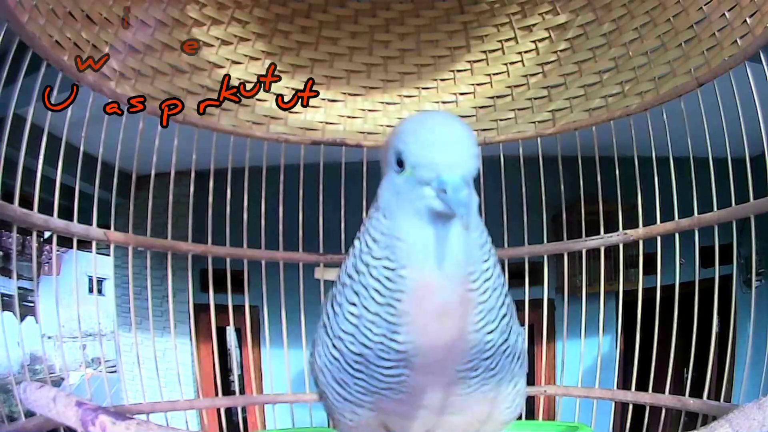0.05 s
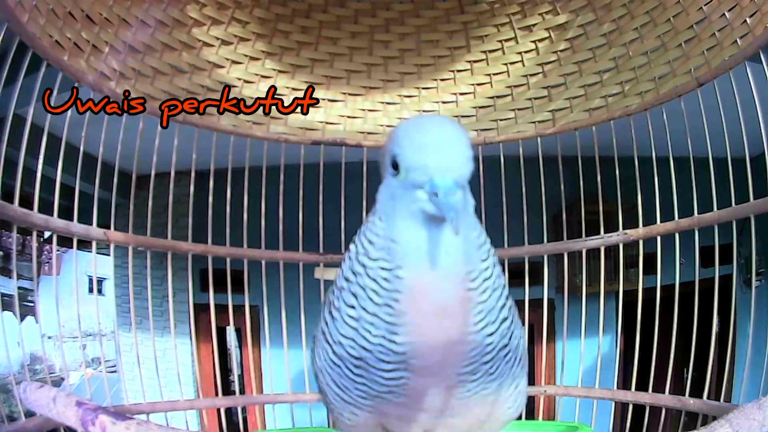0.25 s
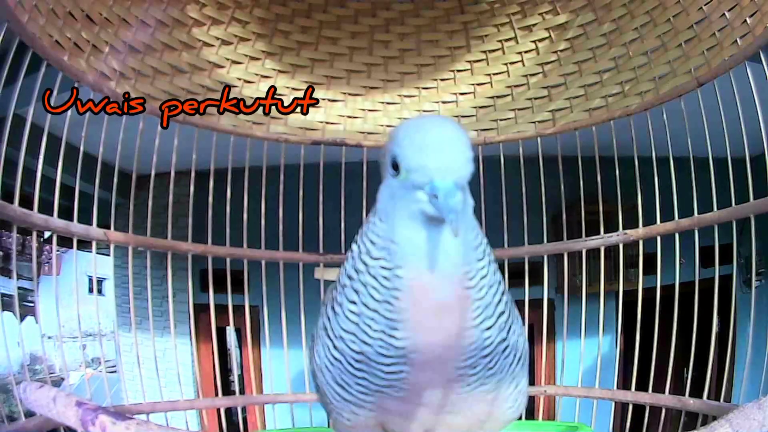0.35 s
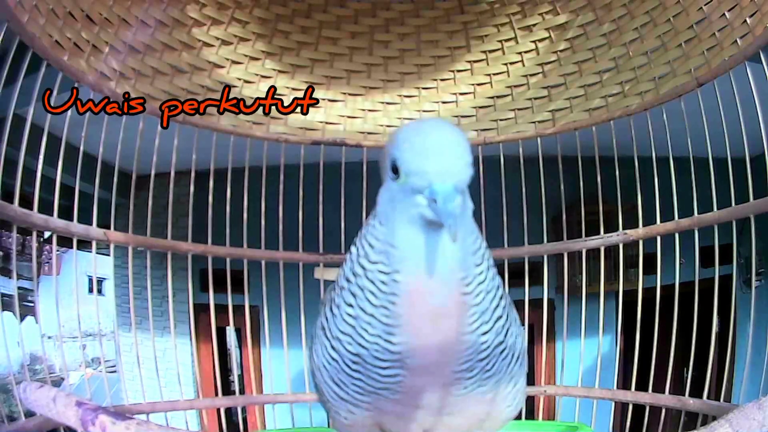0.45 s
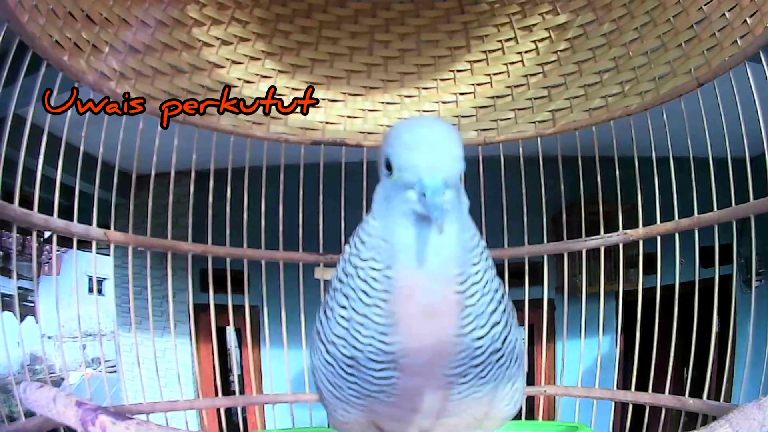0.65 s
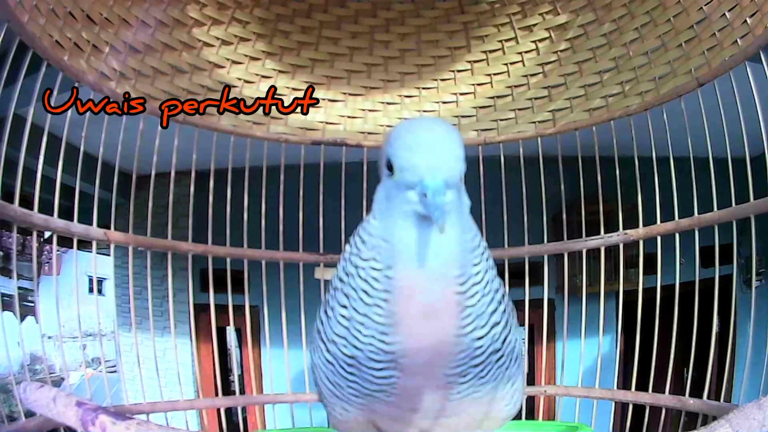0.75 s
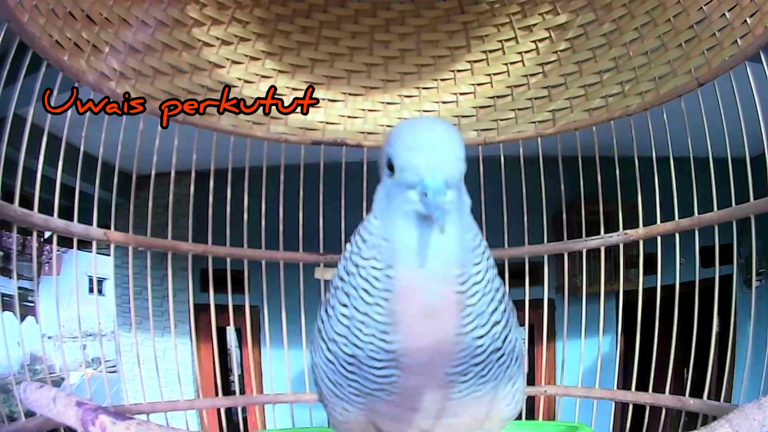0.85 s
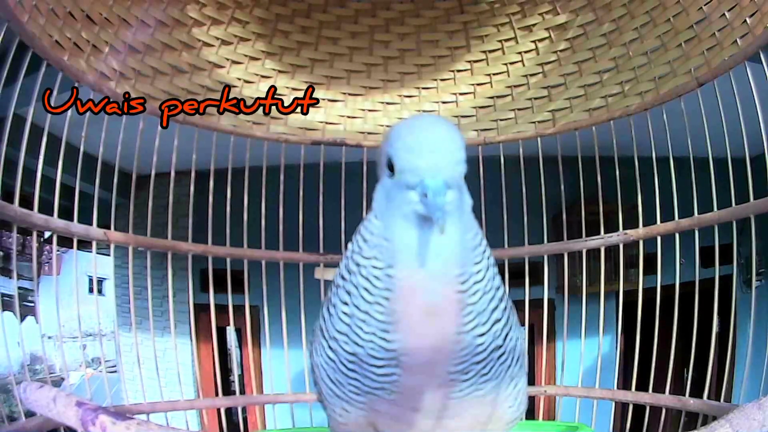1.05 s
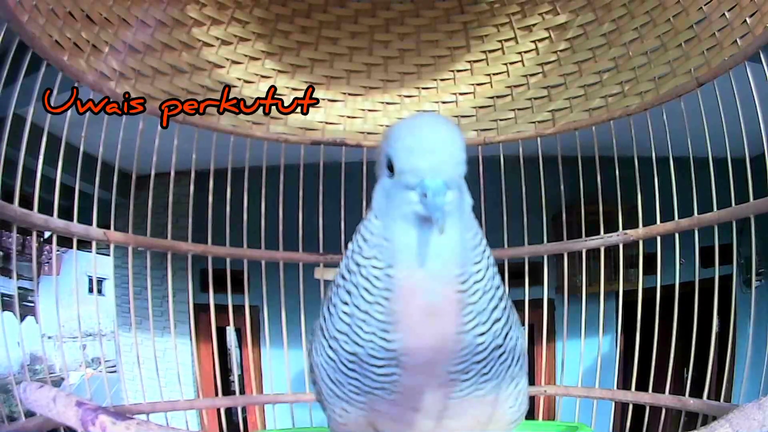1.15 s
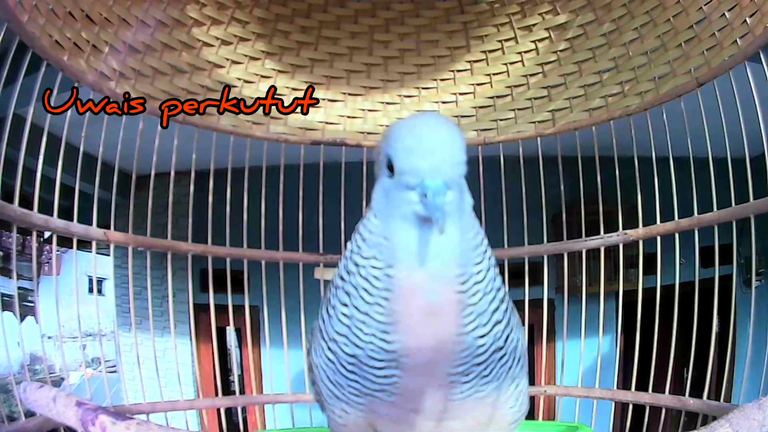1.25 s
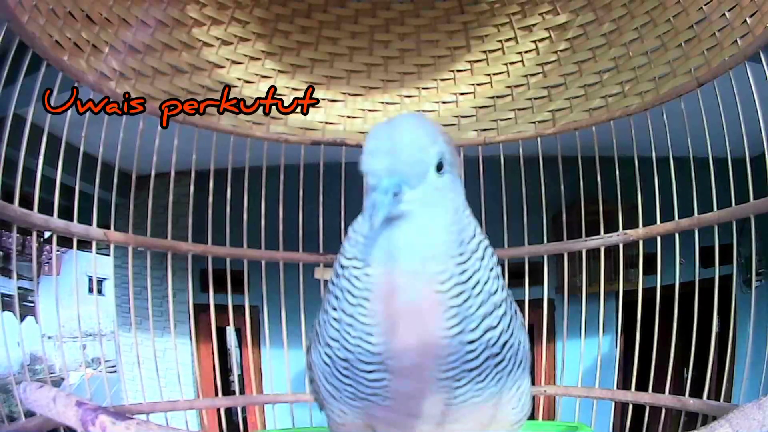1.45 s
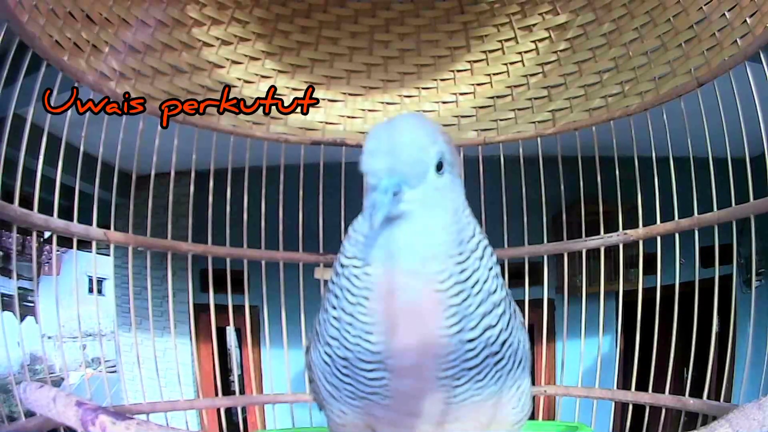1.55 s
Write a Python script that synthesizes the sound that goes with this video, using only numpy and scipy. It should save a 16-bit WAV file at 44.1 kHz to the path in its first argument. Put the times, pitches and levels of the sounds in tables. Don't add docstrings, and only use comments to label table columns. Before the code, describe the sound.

After a faint scrape, knock and tick, a caged dove gives seven loud, nearly pure coos, the last longest and fading; then soft rustling, dull thuds and far knocks, with light wind rumble, captured close on a porch.

```python
import sys
import numpy as np
from scipy import signal
from scipy.fft import rfft, irfft
from scipy.io import wavfile
from scipy.ndimage import uniform_filter1d

SR = 44100
rng = np.random.default_rng(int(sys.argv[2]) if len(sys.argv) > 2 else 0)


def voltage_ratio(decibels):
    exponent = np.asarray(decibels, float) / 20
    return 10 ** exponent


def digitize_waveform(pressure):
    field = np.atleast_2d(pressure).T
    bounded = np.clip(field, -1, 1)
    quanta = np.round(bounded * 32767).astype(np.int16)
    wavfile.write(sys.argv[1], SR, quanta)


N = 70560

# freq_hz, density_db [dB per Hz]
YARD_COLOUR = [(220, -14.5), (400, -18.5), (1100, -20), (2200, -15), (3300, -23), (4300, -39.5),
               (7000, -28.5), (8800, -59)]
# freq_hz, density_db [dB per Hz]
WIND_COLOUR = [(12, -33.5), (20, 1), (96, -9), (169, -11.5), (195, -14), (225, -14), (350, -26.5),
               (460, -22.5), (770, -120)]
# time_s, level_db
WIND_GUSTS = [(0.0, -41), (0.404, -42.5), (0.592, -39), (0.658, -37.5), (0.792, -34), (1.332, -43.5),
              (1.362, -43), (1.6, -41)]
# freq_hz, width_hz, level_db
SCRAPE_RESONANCES = [(764, 420, -43), (2250, 280, -47.5), (3500, 1000, -57), (450, 40, -54.5)]
# start_s, ring_db, ring_hz, t60_s, clatter_db
FAR_KNOCKS = [
    (.165, -45, 1010, 0.16, -41),
    (1.018, -30.5, 1530, 0.42, -38),
    (1.1, -50.5, 1462, 0.9, -59.5),
    (1.3443, -41, 2085, 0.094, -77),
    (1.51, -48.5, 2506, 0.16, -76),
]
# freq_hz, density_db [dB per Hz]
CLATTER_COLOUR = [(200, -17.5), (500, -9.5), (1300, -8.5), (1700, -7), (2600, -4), (4100, -18.5),
                  (4600, -41), (8000, -21)]
# start_s, level_db, ring_hz
THROAT_STUTTERS = [(.2248, -11, 1080), (.2292, -10, 1070), (.2322, -7, 1040), (.2350, -3, 1000),
                   (.2383, -7, 915), (.2405, -9, 915), (.2427, -8, 915), (.3085, -11, 980),
                   (.3512, -15, 1000), (.3540, -12, 900), (.4178, -12, 1020), (.5175, -15, 1050),
                   (.5222, -7, 1050), (.6303, -14, 1020), (.6324, -7, 1030), (.6357, -7, 900),
                   (.6379, -9, 900), (.7598, -19, 950), (.7624, -11, 1050), (.7650, -16, 1000),
                   (.7665, -10, 950)]
# start_s, break_s, end_s, top_pitch_hz
COOS = [
    (.2450, .2712, .3062, 1295),
    (.3124, .3160, .3478, 1297),
    (.3577, .3617, .3962, 1265),
    (.4236, .4315, .4550, 1228),
    (.5270, .5362, .5662, 1243),
    (.6404, .6476, .6895, 1260),
    (.7716, .7790, .8868, 1278),
]
# low_pitch_hz, scoop_hz [start below top], sag_hz [fall at the end]
COO_REGISTERS = [(957, 60, 115), (960, 50, 170), (1020, 130, 270), (945, 130, 200), (925, 140, 200),
                 (930, 160, 235), (940, 150, 265)]
# low_db, held_db, closing_drop_db, break_depth [0-1]
COO_EFFORT = [(6, -1, 0.1, 0.7), (2, -1.5, 0, 0.3), (1, -0.9, -3, 0.3), (6, -1, -2.5, 0.7),
              (5, -2, -3.5, .82), (5, -2.5, -4.5, 0.48), (4, -3.5, -10, 0.6)]
# multiple [of the pitch], level_db
COO_OVERTONES = [(2, -28), (3, -44), (4, -43), (5, -46), (6, -51)]
# start_s, length_s, pitch_hz, level_db
FAR_BIRDS = [
    (.575, .05, 3700, -51),
    (.712, .07, 5750, -54),
    (1.045, .1, 7950, -63),
    (1.08, .06, 5900, -63),
]
# start_s, level_db, pitch_hz
PERCH_BUMPS = [
    (0.943, -20.5, 110),
    (1.066, -24.5, 32.3),
    (1.248, -25, 48.6),
]

YARD_DB = -48.5
HUM_HZ, HUM_DB, HUM_FADE_DB_PER_S = 316.2, -47.5, -10.5
SCRAPE_S, SCRAPE_LENGTH_S, SCRAPE_ROUGH_DB = .035, .17, 1.5
RING_RISE_S, CLATTER_RISE_S = .004, .0097
TICK_S, TICK_HZ, TICK_DB, TICK_T60_S = .1745, 1030, -27, .035
STUTTER_T60_S, STUTTER_GAIN = .019, 1.69
LOW_CLIMB_HZ, LOW_CLIMB_S, LOW_DRIFT_HZ_PER_S = 200, .0034, 900
SCOOP_S, SAG_POWER = .0045, 3.5
ATTACK_S, RELEASE_S, BREAK_S = .0016, .0015, .0011
CLOSE_S, CLOSE_BLUR_S, DULL_DB = .009, .003, -12
FLUTTER_HZ, FLUTTER_DEPTH, FLUTTER_S, PITCH_JITTER = 240, .08, .016, .002
PORCH_DB, PORCH_T60_S = -23, .32
CAGE_DB, CAGE_T60_S = -24, .03
RUSTLE_S, RUSTLE_LENGTH_S, RUSTLE_DB, RUSTLE_HZ = .81, .31, -52, 3270
OVERLOAD_LEVEL, INPUT_TOP_HZ, INPUT_OFFSET = .702, 8500, .006
RASP_DB, RASP_AIR_DB = -52, -44


def times():
    return np.arange(N) / SR


def unit(x):
    return x / np.sqrt(np.mean(x ** 2))


def band(hz, width_hz):
    b, a = signal.iirpeak(hz, hz / width_hz, fs=SR)
    once = signal.lfilter(b, a, rng.standard_normal(N))
    return unit(signal.lfilter(b, a, once))


def coloured(points):
    hz, db = np.array(points).T
    log_hz = np.log(np.maximum(np.arange(N // 2 + 1) * SR / N, 1))
    gain = voltage_ratio(np.interp(log_hz, np.log(hz), db, left=-80, right=-80))
    return unit(irfft(rfft(rng.standard_normal(N)) * gain, N))


def walk(rate_hz):
    k = int(SR / rate_hz)
    return unit(uniform_filter1d(uniform_filter1d(rng.standard_normal(N), k), k))


def struck(start_s, t60_s, rise_s):
    since = np.maximum(times() - start_s, 0)
    return (1 - np.exp(-since / rise_s)) * np.exp(-np.log(1000) * since / t60_s)


def swell(start_s, length_s):
    return np.abs(np.sin(np.pi * np.clip((times() - start_s) / length_s, 0, 1)))


def sine(hz, start_s):
    return np.sin(2 * np.pi * hz * (times() - start_s))


def step(u):
    return .5 + .5 * np.tanh(u)


def yard():
    return voltage_ratio(YARD_DB + .41 * walk(14)) * coloured(YARD_COLOUR)


def wind():
    gust_db = np.interp(times(), *np.array(WIND_GUSTS).T)
    return voltage_ratio(gust_db + 1.2 * walk(16)) * coloured(WIND_COLOUR)


def hum():
    level_db = HUM_DB + HUM_FADE_DB_PER_S * times() + 2 * walk(5)
    return voltage_ratio(level_db) * band(HUM_HZ, 38)


def scrape():
    rough = voltage_ratio(SCRAPE_ROUGH_DB * walk(97))
    body = sum(voltage_ratio(db) * band(hz, width) for hz, width, db in SCRAPE_RESONANCES)
    return swell(SCRAPE_S, SCRAPE_LENGTH_S) * rough * body


def knocks():
    out = 0
    for start, ring_db, hz, t60, clatter_db in FAR_KNOCKS:
        ring = struck(start, t60, RING_RISE_S) * band(hz, 110)
        clatter = struck(start, t60, CLATTER_RISE_S) * 2 * coloured(CLATTER_COLOUR)
        out = out + voltage_ratio(ring_db) * ring + voltage_ratio(clatter_db) * clatter
    return out


def tick():
    return voltage_ratio(TICK_DB) * struck(TICK_S, TICK_T60_S, .001) * sine(TICK_HZ, TICK_S)


def stutters():
    out = 0
    for start, db, hz in THROAT_STUTTERS:
        out = out + STUTTER_GAIN * voltage_ratio(db) * struck(start, STUTTER_T60_S, .0009) * sine(hz, start)
    return out


def coos():
    t, out = times(), 0
    jitter, shimmer = 1 + PITCH_JITTER * walk(420), voltage_ratio(.1 * walk(100))
    for coo, register, effort in zip(COOS, COO_REGISTERS, COO_EFFORT):
        start, flip, end, top_hz = coo
        low_hz, scoop_hz, sag_hz = register
        low_db, high_db, drop_db, break_depth = effort
        arch = np.clip((t - flip) / (end - flip), 0, 1.1)
        since_flip = arch * (end - flip)
        up = step((t - flip) / BREAK_S)

        high = top_hz - scoop_hz * np.exp(-since_flip / SCOOP_S) - sag_hz * arch ** SAG_POWER
        climb = LOW_CLIMB_HZ * np.exp(np.minimum(t - flip, 0) / LOW_CLIMB_S)
        low = low_hz + climb + LOW_DRIFT_HZ_PER_S * np.clip(t - start, 0, flip - start)
        phase = 2 * np.pi * np.cumsum((low + up * (high - low)) * jitter) / SR

        flutter = FLUTTER_DEPTH * np.exp(-since_flip / FLUTTER_S) * sine(FLUTTER_HZ, flip)
        held_db = high_db + drop_db * step((t - end + CLOSE_S) / CLOSE_BLUR_S)
        size = voltage_ratio(low_db + up * (held_db - low_db)) * (1 + up * flutter) * shimmer
        hiccup = 1 - break_depth * np.exp(-((t - flip) / BREAK_S) ** 2)
        gate = step((t - start) / ATTACK_S) * step((end - t) / RELEASE_S)

        overtones = 0
        for k, db in COO_OVERTONES:
            dull = voltage_ratio(DULL_DB * arch ** 3 * (k - 2) / 2)
            overtones = overtones + voltage_ratio(db) * dull * np.sin(k * phase + k)
        out = out + gate * size * hiccup * (np.sin(phase) + gate * overtones)
    return out


def room(x):
    response = 0
    for db, t60 in ((PORCH_DB, PORCH_T60_S), (CAGE_DB, CAGE_T60_S)):
        tail = rng.standard_normal(N) * struck(.00091, t60, .0029)
        response = response + voltage_ratio(db) * tail / np.sqrt(np.sum(tail ** 2))
    return signal.fftconvolve(x, response)[:N]


def birds():
    return sum(voltage_ratio(db) * np.sqrt(swell(start, length)) * band(hz, 194)
               for start, length, hz, db in FAR_BIRDS)


def rustle():
    return voltage_ratio(RUSTLE_DB) * swell(RUSTLE_S, RUSTLE_LENGTH_S) * band(RUSTLE_HZ, 2500)


def bumps():
    return sum(voltage_ratio(db) * struck(start, 8.6 / hz, .0042) * sine(hz, start)
               for start, db, hz in PERCH_BUMPS)


def scene():
    dove = coos() + stutters()
    near = dove + room(dove)
    far = rustle() + birds() + knocks() + scrape()
    perch = tick() + bumps()
    air = hum() + yard() + wind()
    return (near + far + perch + air)[None]


def low_pass(x):
    return signal.sosfilt(signal.butter(12, 15790, fs=SR, output="sos"), x)


def record(dry):
    hard = np.clip(dry, -OVERLOAD_LEVEL, OVERLOAD_LEVEL)
    overload = np.abs(uniform_filter1d(np.abs(dry - hard), size=40, axis=1)) ** .27
    grit = overload * rng.standard_normal(N)
    lowpass = signal.butter(3, INPUT_TOP_HZ, fs=SR, output="sos")
    highpass = signal.butter(2, INPUT_TOP_HZ, "high", fs=SR, output="sos")
    soft = signal.sosfiltfilt(lowpass, hard + voltage_ratio(RASP_DB) * grit)
    hiss = voltage_ratio(RASP_AIR_DB) * signal.sosfilt(highpass, grit)
    return low_pass(soft + hiss + INPUT_OFFSET)


dry = scene()
out = record(dry)
digitize_waveform(out)
```